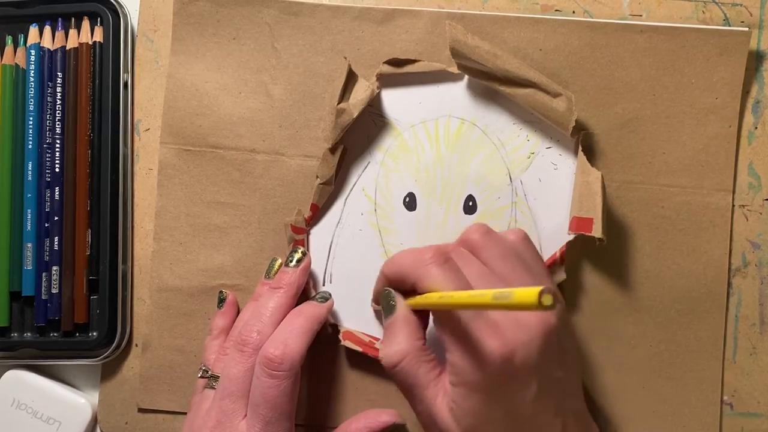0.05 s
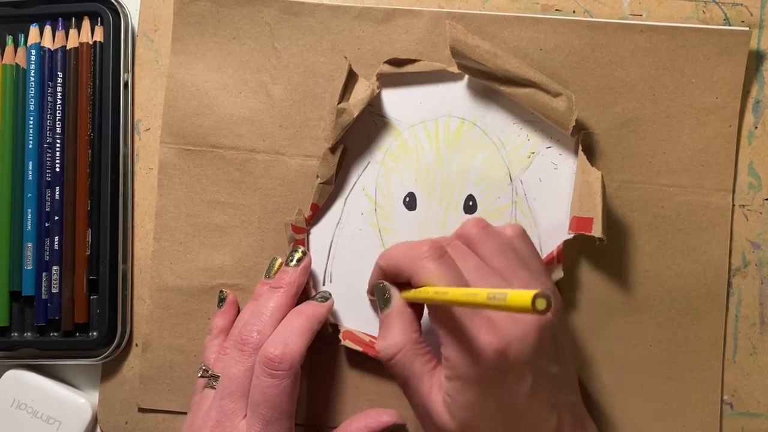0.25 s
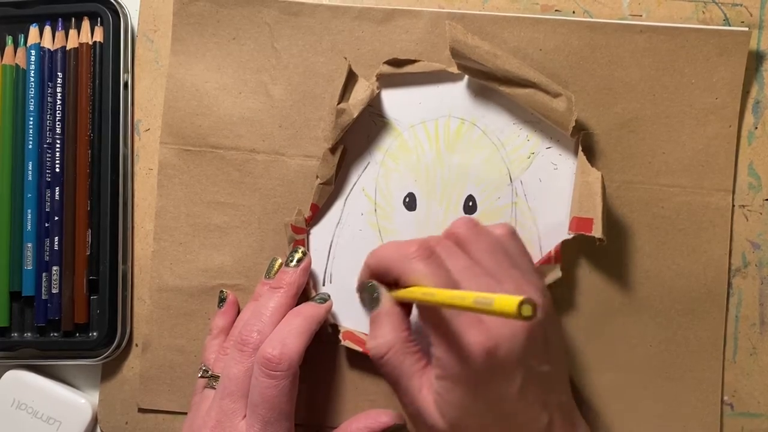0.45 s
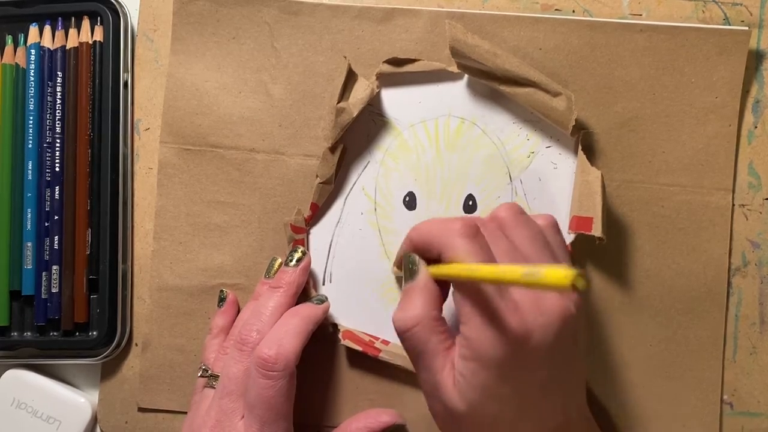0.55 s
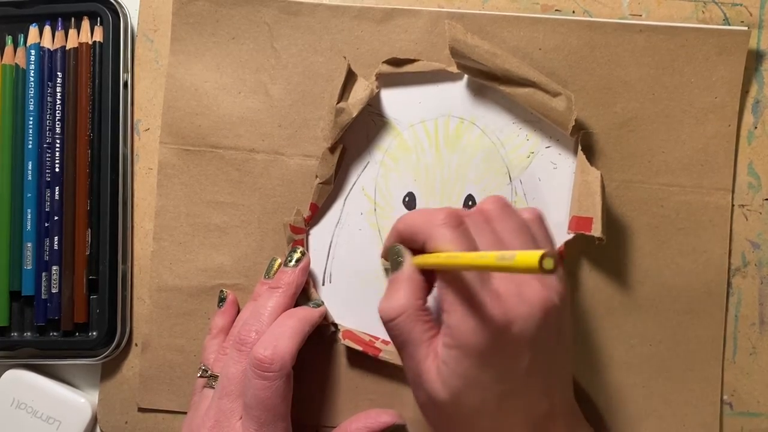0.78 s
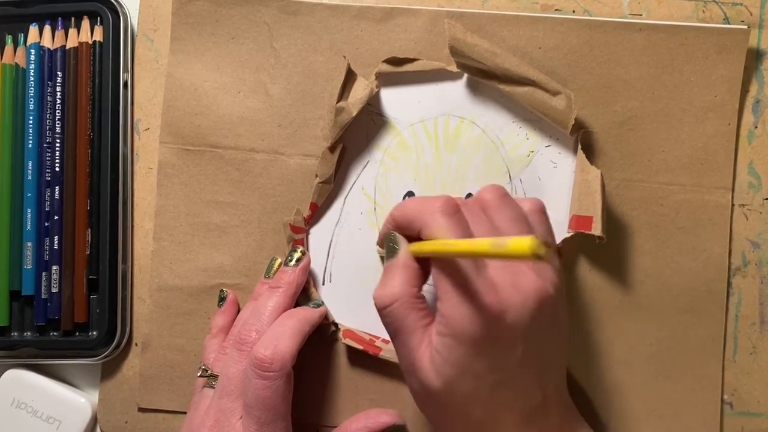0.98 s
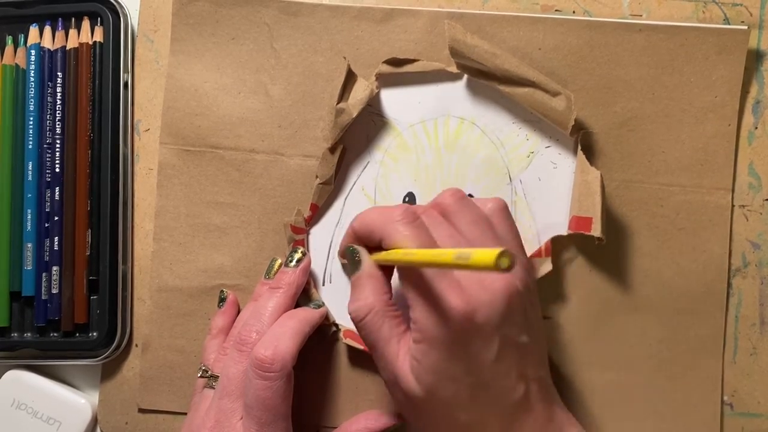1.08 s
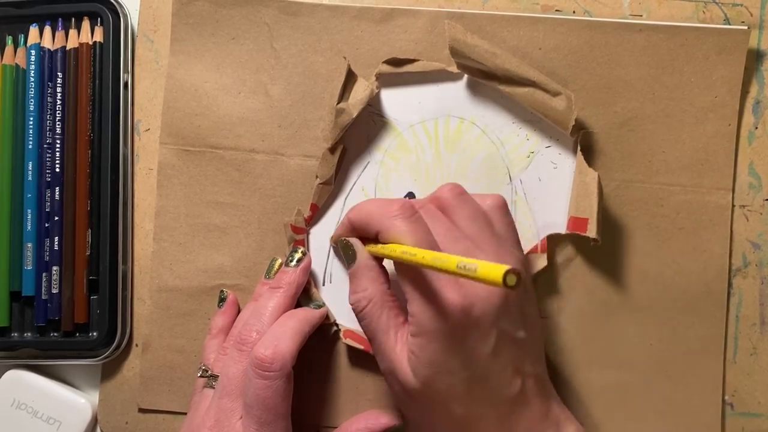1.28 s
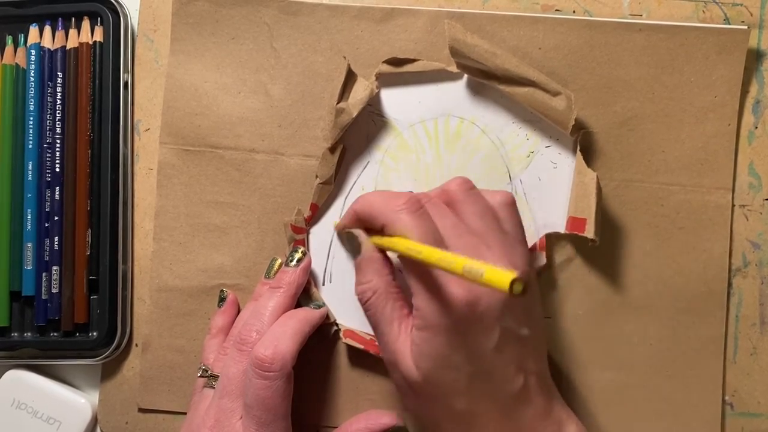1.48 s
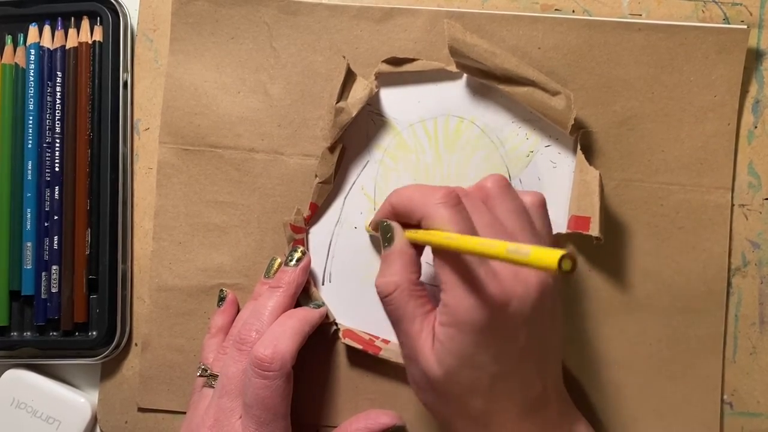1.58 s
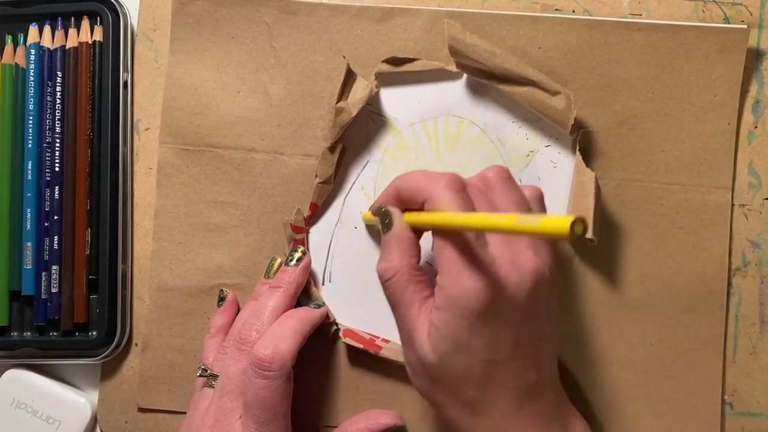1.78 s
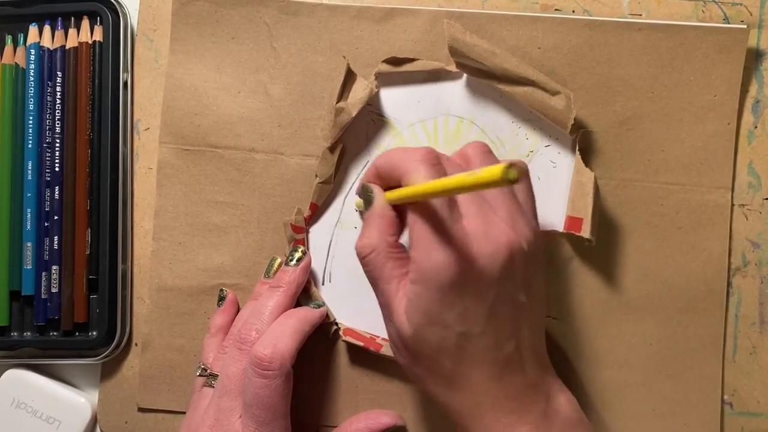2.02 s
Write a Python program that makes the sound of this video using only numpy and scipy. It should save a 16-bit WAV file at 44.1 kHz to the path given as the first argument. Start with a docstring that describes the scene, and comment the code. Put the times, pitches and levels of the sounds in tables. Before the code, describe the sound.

Close up, a pencil stroke tails off, then brisk scratchy strokes follow at about five a second, tapping the desk as they land, with soft hand slides between and faint room hum, picked up by a phone.

```python
"""First comes the tail of a pencil stroke, then quick strokes, about five a second, shading paper on a desk.
Each of these but the last lands with a tick (a burst of noise) and a hollow knock (a push through
desk resonances); the last is only a drag. In a drag the lead moves over the paper grain: dense random
clicks are filtered into rasp and hollow tone, and clicks mixed with smooth noise into hiss.
Between strokes the hand slides back softly, as smoother filtered noise.
All this is close to a phone in a small room, with quiet air noise and a faint hum behind it."""
import sys
import numpy as np
from scipy import signal
from scipy.fft import rfft, irfft
from scipy.io import wavfile
from scipy.ndimage import uniform_filter1d

SR = 44100
rng = np.random.default_rng(int(sys.argv[2]) if len(sys.argv) > 2 else 0)


def materialize(psi):
    """Save the field psi as 16-bit PCM at rate SR to the path in sys.argv[1].

    A 1-D psi becomes a single channel; in a 2-D psi each row is a channel.
    """
    bounded = np.clip(np.atleast_2d(psi).T, -1, 1)
    quanta = np.round(bounded * 32767).astype(np.int16)
    wavfile.write(sys.argv[1], SR, quanta)


N = 90404  # length in samples


def undb(db):
    """Turn decibels into a gain."""
    return 10 ** (np.asarray(db) / 20)


def unit(x):
    """Scale a sound to an rms level of 1."""
    return x / np.sqrt(np.mean(x ** 2))


def through(x, response):
    """Pass a sound through an impulse response."""
    return signal.fftconvolve(x, response)[:N]


def colour(x, points, size=4096):
    """Filter a sound with a given spectrum, as a minimum-phase response of unit energy."""
    hz, db = np.array(points, float).T
    f = np.maximum(np.arange(size // 2 + 1) * SR / size, 1)
    level_db = np.interp(np.log(f), np.log(hz), db)
    # folding the cepstrum forward in time makes the filter start at once
    cepstrum = irfft(np.log(undb(level_db)))
    cepstrum[1:size // 2] *= 2
    cepstrum[size // 2 + 1:] = 0
    response = irfft(np.exp(rfft(cepstrum)))
    return through(x, response / np.linalg.norm(response))


def flutter(hz):
    """Make a smooth random wobble with an rms of 1; higher hz wobbles faster."""
    k = max(int(SR / hz), 2)
    smooth = uniform_filter1d(rng.standard_normal(N), k)
    return unit(uniform_filter1d(smooth, k))


def fade(age, decay_s):
    """Start suddenly at age 0, then die away exponentially."""
    return (age >= 0) * np.exp(-np.maximum(age, 0) / decay_s)


def ring_down(t, t60_s):
    """Die away by 60 dB in t60_s."""
    return np.exp(-np.log(1000) * t / t60_s)


# spectrum of the room noise: pitch_hz, relative level_db (per Hz)
AIR_SPECTRUM = [(20, -0.5), (60, 0.5), (100, -7.5), (210, -7), (300, -10), (500, -12), (1000, -15),
                (2000, -14.5), (3500, -19.5), (5500, -21.5), (11000, -18), (16000, -20)]
AIR_DB = -60.5
HUM_HZ, HUM_DB = 218, -75


def air(t):
    """Quiet room noise is filtered noise; the faint hum is a sine with a wavering phase."""
    hum = unit(np.sin(2 * np.pi * HUM_HZ * t + 1.16 * flutter(7.8)))
    noise = colour(rng.standard_normal(N), AIR_SPECTRUM)
    return undb(AIR_DB) * noise + undb(HUM_DB) * hum


ROOM_T60_S, ROOM_DELAY_S, ROOM_BUILD_S = 0.15, 0.0036, 0.0037


def room(t):
    """Many blurred reflections: noise that builds up, then dies away, with unit energy."""
    build = np.clip((t - ROOM_DELAY_S) / ROOM_BUILD_S, 0, 1)
    tail = rng.standard_normal(N) * build * ring_down(t, ROOM_T60_S)
    return tail / np.linalg.norm(tail)


# return slides of the hand: start_s, length_s, level_db
HAND_SLIDES = [(0.034, 0.12, -65), (.24, 0.052, -63), (0.454, 0.055, -62), (0.664, 0.063, -59),
               (0.864, 0.093, -58.5), (1.032, 0.13, -63), (1.285, 0.069, -61.5), (1.494, 0.048, -59),
               (1.68, 0.079, -58.5), (1.897, 0.084, -60)]
# spectrum of the slides: pitch_hz, relative level_db (per Hz)
SLIDE_SPECTRUM = [(200, -16), (900, 2.5), (1600, 2), (2500, -2.5), (3400, -0.5), (5000, -10.5), (7000, -7),
                  (9000, 1.5), (11500, 2.5), (13500, -5.5), (16000, -19)]
SLIDE_POWER = 0.17  # low power: quick rise, nearly flat middle
SLIDE_ROUGH_DB = 3


def slides(t):
    """The hand brushes back over the sheet, as noise smoother than the lead's grain."""
    loudness = np.zeros(N)
    for start_s, length_s, level_db in HAND_SLIDES:
        progress = np.clip((t - start_s) / length_s, 0, 1)
        loudness += undb(level_db) * np.abs(np.sin(np.pi * progress)) ** SLIDE_POWER
    roughness = undb(SLIDE_ROUGH_DB * flutter(200))
    return colour(loudness * rng.standard_normal(N) * roughness, SLIDE_SPECTRUM)


GRAINS_PER_S, GRAIN_SPREAD_DB = 20000, 1.5
JUDDER_DB, JUDDER_HZ = 3.02, 222


def grain():
    """Dense tiny slips over the paper fibres, uneven in size, with judder in their strength."""
    slips = rng.random(N) < GRAINS_PER_S / SR
    size = undb(GRAIN_SPREAD_DB * np.minimum(rng.exponential(size=N), 5))
    direction = rng.choice([-1, 1], N)
    judder = undb(JUDDER_DB * flutter(JUDDER_HZ))
    return unit(slips * size * direction * judder)


# landings of the lead: time_s, relative force_db, corner_hz (lower is softer), relative tick_db
LEAD_LANDINGS = [(.1273, 8.6, 1166, -3), (0.3315, 10, 1620, -2), (0.5395, 10.5, 1460, -2),
                 (.7536, 10.5, 1490, -2), (.9637, 9.8, 1219, -2.5), (1.172, 12, 995, 2),
                 (1.379, 9.5, 833, -3), (1.5838, 10.5, 800, -4), (1.782, 7, 686, -16)]
# the lead or the sheet catches and crackles: time_s, level_db
PAPER_CATCHES = [(.866, -43), (1.057, -44), (1.069, -44), (1.079, -46), (1.218, -35), (1.238, -37),
                 (1.336, -50.5), (1.675, -49.5)]
# spectra of the tick and the crackle: pitch_hz, relative level_db (per Hz)
TICK_SPECTRUM = [(500, -46), (3000, 11), (5500, -8), (8500, 1), (10800, 10), (13000, -2), (16500, -7)]
CRACKLE_SPECTRUM = [(300, -15), (1000, 14.5), (2500, 10.5), (4200, 5.5), (6000, 1.5), (9000, 9.5),
                    (12000, 10), (16000, -14)]
TICK_DB, TICK_LEAD_S, TICK_DECAY_S = -36.5, 0.00044, 0.00094
CATCH_DECAY_S = 0.0029


def ticks(t):
    """The tip crushes the paper just before the desk takes the blow; now and then it catches."""
    touch, catch = np.zeros(N), np.zeros(N)
    for time_s, _, _, tick_db in LEAD_LANDINGS:
        touch += undb(tick_db) * fade(t - time_s + TICK_LEAD_S, TICK_DECAY_S)
    for time_s, level_db in PAPER_CATCHES:
        catch += undb(level_db) * fade(t - time_s, CATCH_DECAY_S)
    tick = colour(touch * rng.standard_normal(N), TICK_SPECTRUM)
    crackle = colour(catch * grain(), CRACKLE_SPECTRUM)
    return undb(TICK_DB) * tick + crackle


# broad resonances of the desk under the paper: pitch_hz, width_hz, relative level_db
DESK_RESONANCES = [(125, 76, -12.5), (316, 260, -13), (540, 67, -20.5), (995, 194, 0.5), (1278, 71.5, 10),
                   (1392, 56, 2.7), (1687, 170, -2.3), (2690, 310, -7), (3390, 170, -9)]
# reflections from things close by: delay_s, gain (minus flips the wave)
NEAR_REFLECTIONS = [(.00184, 0.32), (.0023, -0.95), (.00303, 0.84), (.00405, -0.4)]
# faint long rings of the desk: pitch_hz, relative level_db, t60_s (time to fall 60 dB)
DESK_RINGS = [(134.74, -61.5, 0.29), (261.3, -60, .25), (342.2, -65.5, 0.27), (804.5, -55, 0.25),
              (1091.7, -74.5, 0.58), (1240, -49, 0.28), (1607, -59, 0.3), (1610, -64, 0.13),
              (1820, -61, 0.033)]
# spectrum of the knocks' room tail: pitch_hz, relative level_db (per Hz)
ROOM_SPECTRUM = [(50, -28.5), (95, -25), (130, -11.5), (170, -14.5), (250, -4.5), (480, -8), (680, -3.5),
                 (1000, -2), (1600, -0.5), (2200, 3), (3200, -7.5), (6000, -6), (16000, -13)]
RING_DB, ROOM_DB = -1.5, -12


def knocks(t):
    """Each landing is a short smooth push on the desk, which thuds, rings faintly and echoes."""
    push = np.zeros(N)
    for time_s, force_db, corner_hz, _ in LEAD_LANDINGS:
        blow = undb(force_db) * signal.unit_impulse(N, round(time_s * SR))
        push -= signal.lfilter(*signal.butter(3, corner_hz, fs=SR), blow)
    thud = np.zeros(N)
    for pitch_hz, width_hz, level_db in DESK_RESONANCES:
        resonance = signal.iirpeak(pitch_hz, pitch_hz / width_hz, fs=SR)
        thud += undb(level_db) * signal.lfilter(*resonance, push)
    near = thud.copy()
    for delay_s, gain in NEAR_REFLECTIONS:
        near += gain * np.interp(t - delay_s, t, thud, left=0)
    rings = np.zeros(N)
    for pitch_hz, level_db, t60_s in DESK_RINGS:
        rings += undb(level_db) * np.sin(2 * np.pi * pitch_hz * t) * ring_down(t, t60_s)
    ringing = undb(RING_DB) * through(push, rings)
    echo = undb(ROOM_DB) * colour(through(push, room(t)), ROOM_SPECTRUM)
    return near + ringing + echo


# drags of the lead: start_s, length_s, rasp_db, hollow_db, hiss_db, hiss centre_hz,
# swell (a power without unit: low is even, high is peaked)
LEAD_DRAGS = [(-.07, 0.1, -47.5, -58, -49.5, 10200, 2.5), (0.129, 0.11, -49.5, -61, -50.5, 10240, 1.8),
              (0.333, 0.11, -48.5, -59.5, -50, 10170, 1.4), (0.543, 0.12, -54, -60.5, -49, 10100, 1.15),
              (0.758, 0.11, -49.5, -59.5, -50.5, 10000, 1.35), (0.963, .11, -51, -52.5, -50, 10400, 0.71),
              (1.173, 0.093, -48.5, -47, -46.5, 10400, 0.9), (1.38, 0.096, -48.5, -49.5, -53, 10900, 0.5),
              (1.584, .08, -47.5, -48, -53, 10880, .4), (1.783, .11, -57, -55.5, -55, 11360, 0.49),
              (1.984, 0.13, -52, -57, -51, 11300, 0.86)]
# spectra of the three parts of a drag: pitch_hz, relative level_db (per Hz)
RASP_SPECTRUM = [(40, -16), (130, -4.5), (190, -23.5), (330, -12.5), (530, -9), (700, -11.5), (1000, 3.5),
                 (1300, -3.5), (1650, -2), (2100, -10), (2800, -19.5), (4500, -25.5), (16000, -64)]
HOLLOW_SPECTRUM = [(100, -19), (340, -20), (540, -14), (630, 4.5), (800, 0), (950, -2.5), (1250, -21),
                   (2500, -22.5), (8000, -35)]
HISS_SPECTRUM = [(200, -28), (2000, -3), (3500, -6), (5200, -13), (7000, -5), (8700, 1), (11500, 4),
                 (13200, -5), (15000, -6), (16500, -2)]  # moved up or down in pitch for each drag
PRESS_ATTACK_S, PRESS_RELEASE_S = 0.022, 0.038
SPEED_PEAK_SHARE = 0.6  # the tip is fastest at this share of the drag
HISS_CENTRE_HZ = 10300  # a drag with this centre leaves the hiss spectrum unmoved
HISS_GRAIN_SHARE = 0.21  # share of the hiss power made of grain; the rest is smooth noise


def drags(t):
    """Pressure makes the desk rasp and sound hollow; the speed of the tip makes the paper hiss."""
    rasp, hollow, hiss = np.zeros(N), np.zeros(N), np.zeros(N)
    rough = np.sqrt(HISS_GRAIN_SHARE) * grain()
    fibres = rough + np.sqrt(1 - HISS_GRAIN_SHARE) * rng.standard_normal(N)
    for start_s, length_s, rasp_db, hollow_db, hiss_db, centre_hz, swell in LEAD_DRAGS:
        age = t - start_s
        press = np.clip(age / PRESS_ATTACK_S, 0, 1)
        release = np.clip((length_s - age) / PRESS_RELEASE_S, 0, 1)
        rasp += undb(rasp_db) * press * release
        hollow += undb(hollow_db) * press * release
        ramp = np.interp(age / length_s, [0, SPEED_PEAK_SHARE, 1], [0, 1, 0])
        speed = np.sin(np.pi / 2 * ramp)
        shifted = [(hz * centre_hz / HISS_CENTRE_HZ, db) for hz, db in HISS_SPECTRUM]
        hiss += colour(undb(hiss_db) * speed ** swell * fibres, shifted)
    return colour(grain() * rasp, RASP_SPECTRUM) + colour(grain() * hollow, HOLLOW_SPECTRUM) + hiss


FRICTION_ROOM_DB, ROOM_DAMP_HZ = -7, 3400


def scene():
    """Knocks and friction over the quiet air of the room, which swallows treble in the friction's echo."""
    t = np.arange(N) / SR
    friction = slides(t) + ticks(t) + drags(t)
    echo = through(friction, room(t))
    wash = signal.lfilter(*signal.butter(1, ROOM_DAMP_HZ, fs=SR), echo)
    mix = air(t) + knocks(t) + friction + undb(FRICTION_ROOM_DB) * wash
    return mix[None]  # one channel


TOP_HZ = 15900


def record(dry):
    """The phone cuts the top with a steep low-pass filter."""
    low_pass = signal.ellip(10, .1, 70, TOP_HZ, fs=SR, output="sos")
    return signal.sosfilt(low_pass, dry)


dry = scene()
out = record(dry)
materialize(out)
```